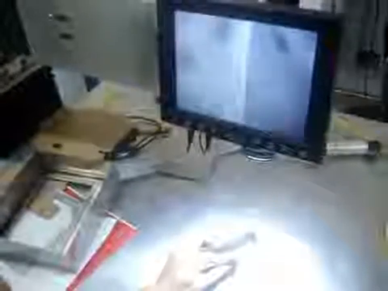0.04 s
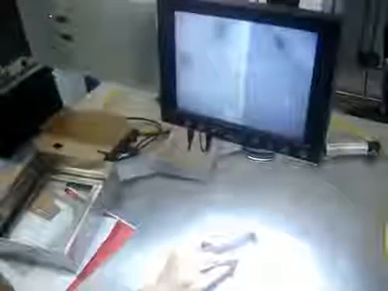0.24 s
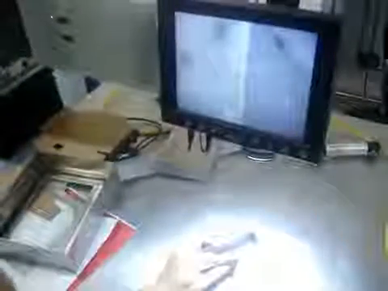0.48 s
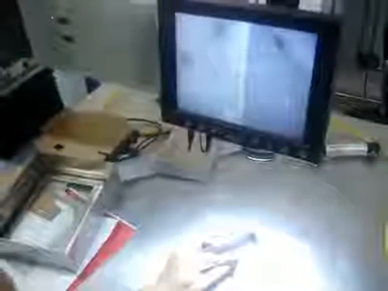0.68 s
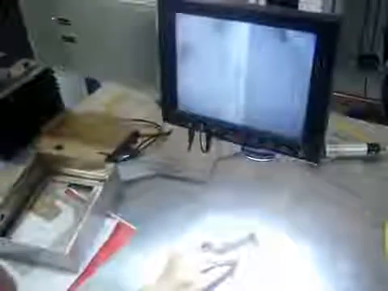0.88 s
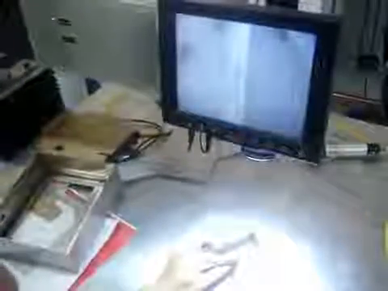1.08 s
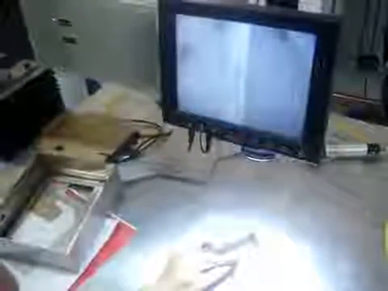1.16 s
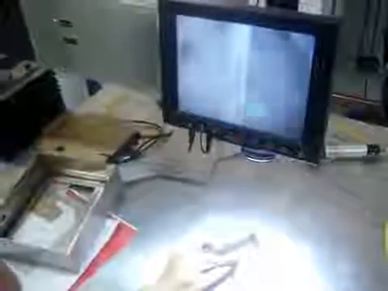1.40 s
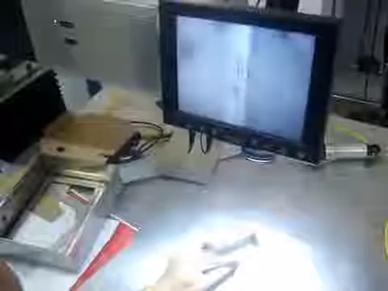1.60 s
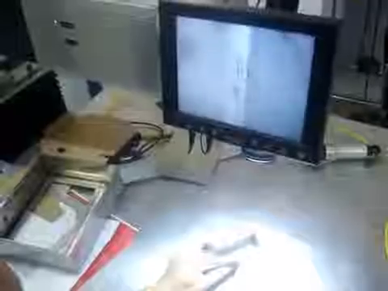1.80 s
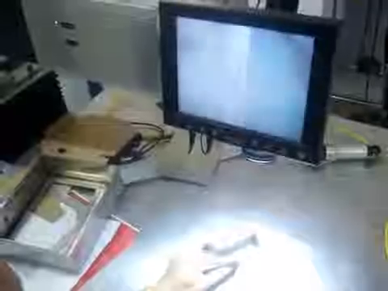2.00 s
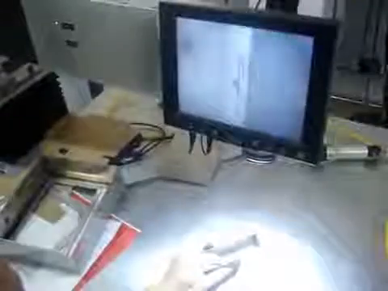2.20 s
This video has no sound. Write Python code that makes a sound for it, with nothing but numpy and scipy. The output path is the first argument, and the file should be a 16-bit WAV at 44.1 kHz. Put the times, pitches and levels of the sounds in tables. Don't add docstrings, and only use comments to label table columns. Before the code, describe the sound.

Hard, knocking electric pulses from a close welding machine: three at 0.0-0.15 s, about fifteen per second, then a short puff. At 0.23-0.5 s a hollow air pop and rough rush burst out and ring away. Fan hum follows. Four rattling clacks come at 1.3-1.5 s and four more at 1.9-2.1 s with gas hiss, then a faint scrape. Echoing hall, limited patchy treble.

```python
import sys
import numpy as np
from scipy import signal
from scipy.fft import rfft, irfft
from scipy.io import wavfile
from scipy.ndimage import uniform_filter1d

SR = 44100
rng = np.random.default_rng(int(sys.argv[2]) if len(sys.argv) > 2 else 0)


def output_pcm(signal):
    pcm = np.clip(np.atleast_2d(signal).T, -1, 1) * 32767
    wavfile.write(sys.argv[1], SR, np.round(pcm).astype(np.int16))


def invert_db(x):
    u = np.asarray(x, float) / 20
    return 10 ** u


N = 99225
T = np.arange(N) / SR

# [f/Hz, level/dB per Hz]
HUM_COLOUR = [(20, -58.5), (60, -18), (200, -6), (400, -5.5), (800, -7.5), (1100, -11), (3500, -22.5),
              (10300, -37)]
# [f/Hz, level/dB]
FAN_TONES = [(301.5, -50), (405, -47), (651.4, -46), (795, -41.5), (893.6, -47)]

# [t/s, snap level/dB, crack level/dB, knock level/dB, level of outer snap tones/dB]
PULSES = [(0.0169, -19.5, -12, -0.5, 5), (0.0834, -16, -15.5, -8, 1.5), (0.1498, -25.5, -6.5, -1, 5),
          (1.3056, -15, -13, -7, -5), (1.3713, -24, 1.5, -1, -5), (1.4393, -20, -14.5, -7.5, 3),
          (1.506, -27, -3, 2, 4.5), (1.8835, -19.5, -16.5, -4.5, 5), (1.95, -21, -13.5, -3, 2),
          (2.0167, -23, -8.5, -3.5, -1), (2.083, -23, -8.5, -8.5, -3)]
# [run start t/s, level/dB]
RUN_PUSH = [
    (0, -42),
    (1.2, -36),
    (1.8, -67),
]
# [f/Hz, level/dB, width/s]
SNAP_TONES = [(1430, -5, 0.00079), (1966, 0, 0.001), (2507, -1, 0.0003)]
# [f/Hz, level/dB per Hz]
CRACK_COLOUR = [(2500, -3), (3500, -3.5), (4800, -5), (6300, -1), (8000, -9), (9300, 2), (10300, -6.5),
                (12000, -30)]
# [f/Hz, width/Hz, level/dB]
CASING = [(6650, 990, 5.5), (10010, 300, 3.5), (418, 49, 8.5), (930, 670, 7.5)]
# [f/Hz, width/Hz, level/dB]
HOUSING = [(401, 33, -2), (685, 47, 2), (780, 72, 2), (1000, 90, -2.5)]
# [f/Hz, width/Hz, level/dB]
CLUTTER = [(1500, 700, -3), (2170, 300, 2.5), (3000, 1200, 0)]
# [t/s, level/dB, f/Hz, width/s]
PLATE_KNOCKS = [(.0245, -24, 760, 0.0016), (.0275, -19.5, 730, .001), (.0935, -21, 780, 0.0017),
                (.1605, -16, 700, 0.00049), (.171, -22, 700, .0012), (1.3165, -18, 764, 0.0022),
                (1.3835, -14.5, 680, 0.00091), (1.45, -23, 800, 0.00088), (1.5165, -20, 780, 0.0013),
                (1.894, -17.5, 750, 0.0024), (1.9605, -20, 750, 0.0011), (2.027, -21, 700, 0.00068),
                (2.0935, -21, 770, 0.00079)]
# [t/s, level/dB, f/Hz, width/s]
SHORT_TICKS = [(.026, -37, 4870, 0.0024), (.094, -36, 9700, .002), (.161, -38, 9900, 0.0017),
               (.996, -39, 3300, .0015), (1.3075, -19.5, 6200, 0.0012), (1.3075, -23, 7500, .0008),
               (1.312, -25, 9440, 0.0012), (1.321, -24, 6200, .0012), (1.324, -29, 1850, .002),
               (1.376, -32, 9050, .001), (1.379, -33, 9800, .0015), (1.385, -26, 6600, 0.0017),
               (1.392, -35, 6540, 0.0018), (1.45, -39, 9740, 0.0021), (1.44, -31, 4830, .001),
               (1.507, -30, 4960, .001), (1.8845, -24, 4740, 0.0013), (1.894, -36, 9700, .001),
               (1.9515, -28.5, 9100, .001), (1.9515, -32, 6000, .001), (1.964, -37, 9600, 0.0013),
               (2.018, -28, 9430, 0.0011), (2.0185, -22, 4860, .001), (2.085, -28, 5060, 0.00092),
               (2.118, -29, 4500, .0006), (1.952, -23, 1700, .0012)]

# [f/Hz, time to fall 60 dB/s]
HALL_RING = [(60, 1.36), (160, 1.1), (420, 1.14), (1100, 1), (2910, 1), (7680, 0.68)]

# [t/s, level/dB, decay/s, level of upper whistles/dB]
PUFFS = [
    (0.178, -19, 0.012, -3.5),
    (1.271, -24.5, 0.022, 2.5),
    (1.569, -26, 0.033, 0),
    (1.8496, -22.5, 0.014, 3.5),
    (2.114, -26.5, 0.068, 3),
]
# [f/Hz, width/Hz, level/dB]
NOZZLE = [(4400, 530, 3.5), (6200, 300, 12), (8300, 1200, 8), (9900, 830, -4.5)]
# [t/s, level/dB]
GAS_FLOW = [
    (1.87, -53),
    (1.895, -33.5),
    (1.94, -30.5),
    (1.97, -32.5),
    (2.01, -34),
    (2.06, -39.5),
    (2.1, -44),
    (2.13, -54),
    (2.25, -41.5),
]
# [f/Hz, level/dB per Hz]
GAS_COLOUR = [(2000, -37), (3600, -16), (4200, -3), (5000, -8.5), (5900, -4.5), (6500, -14.5), (10000, -23),
              (11000, -55)]

# [f/Hz, width/Hz, level/dB]
HOSE_BODY = [(129.6, 11.6, -9), (196, 13, -9), (312.6, 30, 1), (540, 78, -10), (680, 54, -8),
             (1127, 39, -14)]
# [t/s, jet level/dB, brightness/dB per octave]
BLOW = [
    (.228, -50, -9),
    (.243, -14, -9.5),
    (.27, -15, -2),
    (.29, -13, -10.5),
    (.312, -6.5, -7),
    (.33, -9.5, -1.5),
    (.38, -12, -5),
    (.42, -12.5, -4),
    (.49, -18.5, -12),
]
# [f/Hz, level/dB per Hz]
JET_COLOUR = [(50, -32), (170, -15.5), (540, -0.5), (930, -3.5), (1600, -9.5), (3000, -14), (7070, -25),
              (10300, -35)]
# [t/s, f/Hz, level/dB]
THROAT = [
    (.27, 900, -31),
    (.31, 1050, -10.5),
    (.345, 1700, -12),
    (.38, 1200, -16.5),
    (.41, 1500, -19),
    (.47, 1100, -25),
]

# [t/s, length/s, f/Hz, width/Hz, level/dB]
LEAKS = [
    (1.7, 0.027, 3300, 720, -55),
    (1.63, 0.18, 8020, 600, -52.5),
    (2.125, 0.13, 6150, 140, -46),
    (1.31, 0.036, 6900, 500, -33.5),
    (1, 0.082, 3200, 420, -49),
    (1.952, .045, 4800, 350, -41),
    (2.19, 0.045, 6100, 200, -42),
    (1.9, 0.15, 4400, 400, -41),
]

# [t/s, level/dB]
SCRAPE_LEVEL = [
    (2.1, -59),
    (2.14, -29),
    (2.17, -34),
    (2.22, -31),
    (2.25, -45),
]
# [f/Hz, width/Hz, level/dB]
BENCH = [(414, 73, -4.5), (770, 100, -4), (1200, 350, -2.5), (2170, 120, -7), (2670, 810, -6.5)]

# [middle t/s, length/s, from f/Hz, to f/Hz]
TREBLE_GAPS = [(.004, 0.0026, 5500, 11000), (0.074, 0.017, 8300, 11000), (0.094, 0.011, 5000, 7500),
               (0.145, 0.0094, 4500, 7460), (0.157, 0.02, 6450, 7200), (0.068, .02, 5200, 7200),
               (1.265, 0.017, 4500, 11000), (1.298, 0.013, 5270, 11000), (1.369, 0.011, 4980, 6800),
               (1.457, 0.018, 5000, 6500), (1.529, 0.026, 8000, 10980), (1.53, 0.036, 7250, 7900),
               (1.534, 0.043, 5600, 6300), (1.53, .04, 4500, 4900), (1.56, 0.012, 5300, 7500),
               (2.103, 0.0097, 4810, 7500), (1.604, 0.0086, 5500, 7000), (1.838, 0.022, 4400, 11000),
               (1.874, 0.0066, 4800, 6500), (1.319, 0.0062, 7600, 11000), (1.392, 0.01, 7600, 11000),
               (1.459, 0.0072, 7500, 11000), (1.94, 0.014, 8340, 11000), (2.034, 0.01, 4970, 7000),
               (2.035, 0.026, 8370, 11000), (2.102, 0.029, 8300, 10730)]


def evened(x):
    return x / np.sqrt(np.mean(x ** 2) + 1e-20)


def read(points, hz):
    f, value = np.transpose(points)
    return np.interp(np.log(hz + 1), np.log(f + 1), value)


def level(curve, col=1):
    points = np.array(curve)
    return invert_db(np.interp(T, points[:, 0], points[:, col], -120, -120))


def noise():
    return rng.standard_normal(N)


def coloured(points):
    gain = invert_db(read(points, np.fft.rfftfreq(N, 1 / SR)))
    return evened(irfft(rfft(noise()) * gain, N))


def resonate(x, hz, width):
    turn = np.exp(2j * np.pi * hz * T)
    r = np.exp(-np.pi * width / SR)
    return 2 * (turn * signal.lfilter([1 - r], [1, -r], x / turn)).real


def through(x, peaks):
    out = np.zeros(N)
    for k, (hz, width, db) in enumerate(peaks):
        out += (-1) ** k * invert_db(db) / np.sqrt(width) * resonate(x, hz, width)
    return evened(out)


def narrow_hiss(hz, width):
    return evened(resonate(resonate(noise(), hz, width), hz, width))


def hum():
    out = invert_db(-35) * coloured(HUM_COLOUR)
    for hz, db in FAN_TONES:
        tone = np.sqrt(2) * np.cos(2 * np.pi * (hz * T + rng.random()))
        waver = 0.05 * evened(resonate(noise(), hz, 12))
        out += invert_db(db) * (tone + waver)
    on = (rng.random(N // 256 + 1) < 0.5).repeat(256)[:N]
    stutter = uniform_filter1d(on * 1., size=100)
    return out + invert_db(-56) * stutter * narrow_hiss(8800, 350)


def pulses():
    snap_peak_s, crack_peak_s, crack_width_s = 0.0016, 0.0019, 0.0012
    push_s, knock_rise_s = 0.0014, 0.0095
    direct, far = np.zeros(N), np.zeros(N)
    crack = coloured(CRACK_COLOUR)
    rattle, ring, echo = (through(noise(), body) for body in (CASING, HOUSING, CLUTTER))
    for s, db, crack_db, knock_db, side_db in PULSES:
        t = T - s
        after = np.maximum(t, 0)
        started = t > 0
        snap = started * invert_db(-12) * echo * np.exp(-after / 0.023)
        for k, (hz, tone_db, width) in enumerate(SNAP_TONES):
            gain = invert_db(tone_db + side_db * (k != 1) + 2 * rng.random())
            shape = np.exp(-((t - snap_peak_s) / width) ** 2 / 2)
            snap += gain * shape * np.cos(2 * np.pi * (hz * t + rng.random()))
        burst = crack * np.exp(-((t - crack_peak_s) / crack_width_s) ** 2 / 2)
        burst += started * invert_db(-8) * rattle * np.exp(-after / 0.014)
        knock = invert_db(-9.5) * ring * np.minimum(after / knock_rise_s, 1) * np.exp(-after / 0.042)
        body = invert_db(crack_db + 7) * burst + invert_db(knock_db + 4.5) * knock
        push_db = [run_db for start, run_db in RUN_PUSH if start <= s][-1]
        push = invert_db(push_db + 4) * after / push_s * np.exp(1 - after / push_s)
        direct += push + invert_db(db) * (snap + body)
        far += invert_db(db) * (invert_db(-4) * snap + body)
    loose = chatter()
    return direct + loose, far + loose


def chatter():
    out = np.zeros(N)
    for s, db, hz, width in PLATE_KNOCKS + SHORT_TICKS:
        t = T - s
        out += invert_db(db) * np.exp(-(t / width) ** 2 / 2) * np.cos(2 * np.pi * hz * t)
    return out


def tail(x):
    hz, t, z = signal.stft(rng.standard_normal(2 * SR), SR, nperseg=512)
    fade = invert_db(-60 * t / read(HALL_RING, hz)[:, None])
    ring = signal.istft(z * fade, SR, nperseg=512)[1]
    ring *= 1 - np.exp(-(np.arange(len(ring)) / SR / 0.013) ** 2)
    return signal.fftconvolve(x, ring / np.linalg.norm(ring))[:N]


def hall(x):
    turn = 2 * np.pi * 6 * T
    return tail(x * np.cos(turn)) + tail(x * np.sin(turn))


def valve():
    rise_s = 0.00049
    low = through(noise(), NOZZLE[:1]) + invert_db(-10.5) * coloured(CRACK_COLOUR)
    high = through(noise(), NOZZLE[1:])
    out = level(GAS_FLOW) * coloured(GAS_COLOUR)
    for s, db, decay_s, high_db in PUFFS:
        t = T - s
        shape = np.clip(t / rise_s, 0, 1) * np.exp(-(np.maximum(t, 0) / decay_s) ** 0.93)
        out += invert_db(db - 10.5) * shape * (low + invert_db(high_db) * high)
    return out


def hose_pop():
    rise_s, hold_s, fall_s = 0.028, 0.059, 0.011
    t = T - 0.233
    shape = np.clip(t / rise_s, 0, 1) * np.exp(-np.maximum(t - hold_s, 0) / fall_s)
    boom = invert_db(-1.5) * np.sin(2 * np.pi * 314.5 * t)
    return invert_db(-11.5) * shape * (through(noise(), HOSE_BODY) + boom)


def jet():
    bright_hz = 2470
    hz, t, z = signal.stft(coloured(JET_COLOUR), SR, nperseg=256)
    blow_s, _, blow_tilt = np.transpose(BLOW)
    octaves = np.log2(np.maximum(hz / bright_hz, 1))[:, None]
    tilt_db = np.interp(t, blow_s, blow_tilt) * octaves
    rush = signal.istft(z * invert_db(tilt_db), SR, nperseg=256)[1][:N]
    buffet = np.exp(-((T - 0.344) / 0.039) ** 2) * evened(resonate(noise(), 77, 30))
    return level(BLOW) * rush + throat() + invert_db(-36) * buffet


def throat():
    width_hz = 470
    throat_s, throat_hz, _ = np.transpose(THROAT)
    turn = np.exp(2j * np.pi * np.cumsum(np.interp(T, throat_s, throat_hz)) / SR)
    r = np.exp(-np.pi * width_hz / SR)
    moving = (turn * signal.lfilter([1 - r], [1, -r], noise() / turn)).real
    return level(THROAT, col=2) * evened(moving)


def leaks():
    out = np.zeros(N)
    for s, length_s, hz, width, db in LEAKS:
        rise = (T - s) / 0.0053
        fall = (s + length_s - T) / length_s * 2
        out += invert_db(db) * np.clip(np.minimum(rise, fall), 0, 1) * narrow_hiss(hz, width)
    return out


def scrape():
    slips_per_s = 2500
    slips = rng.uniform(-1.06, 1, N) * (rng.random(N) < slips_per_s / SR)
    return level(SCRAPE_LEVEL) * through(slips, BENCH)


def scene():
    room = hum()
    direct, far = pulses()
    air = valve() + leaks() + scrape()
    pop, blow = hose_pop(), jet()
    to_hall = invert_db(-5.5) * (far + air) + invert_db(-5) * pop + invert_db(-3.5) * blow
    return (direct + air + pop + blow + hall(to_hall) + room)[None]


def band_limit(x):
    return signal.sosfilt(signal.butter(12, 11380, fs=SR, output="sos"), x)


def record(dry):
    hz, t, z = signal.stft(np.tanh(dry / 0.98) * 0.9, SR, nperseg=256, noverlap=192)
    hz = hz[:, None]
    gap = 0
    for s, length_s, low, high in TREBLE_GAPS:
        depth = 0.65 if 900 < high - low < 3000 else 1
        gap = gap + depth * np.exp(-((t - s) / (length_s / 2)) ** 6) * (hz > low) * (hz < high)
    patches = rng.standard_normal((len(t) // 8 + 1, 33)).T
    patches = patches.repeat(4, axis=0).repeat(8, axis=1)[:len(hz), :len(t)]
    holes = (rng.random((len(t) // 5 + 1, 44)) < 0.07).T
    holes = holes.repeat(3, axis=0).repeat(5, axis=1)[:len(hz), :len(t)]
    patchy_db = (2.5 * patches - 20 * holes) * (hz > 4500)
    z = z * invert_db(-32 * np.clip(gap, 0, 1) + patchy_db)
    x = signal.istft(z, SR, nperseg=256, noverlap=192)[1][:, :N]
    edge = signal.firwin(511, 10150, window=("kaiser", 9), fs=SR)
    mix = signal.oaconvolve(x, edge[None], "same")
    return band_limit(mix)


dry = scene()
out = record(dry)
output_pcm(out)
```